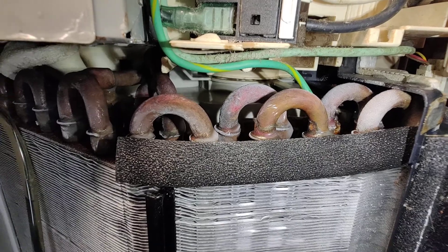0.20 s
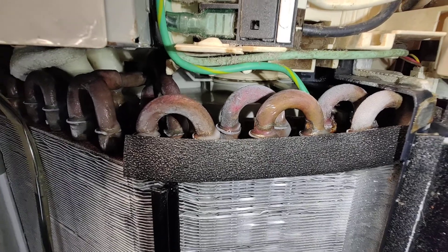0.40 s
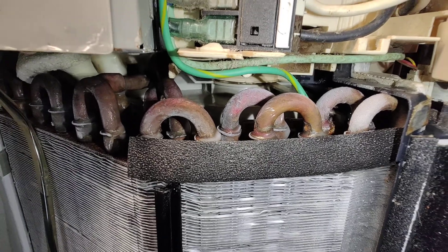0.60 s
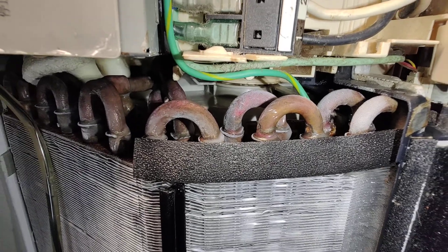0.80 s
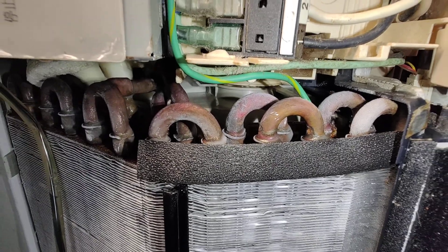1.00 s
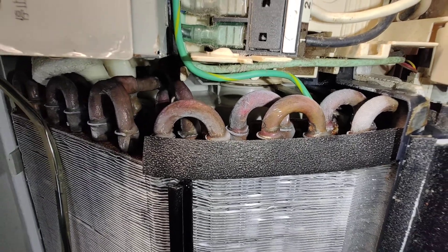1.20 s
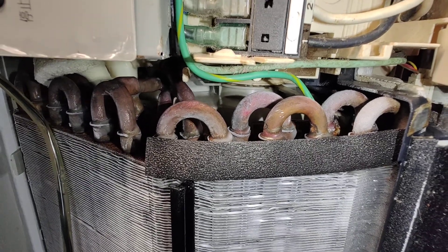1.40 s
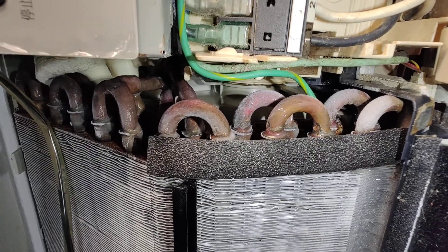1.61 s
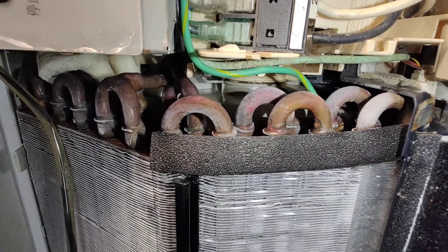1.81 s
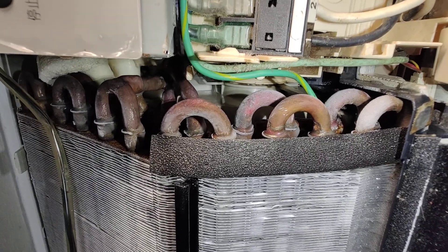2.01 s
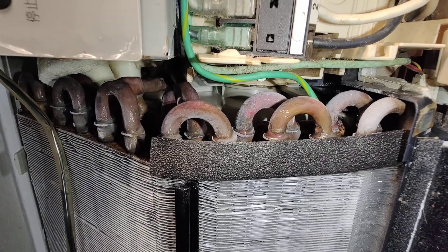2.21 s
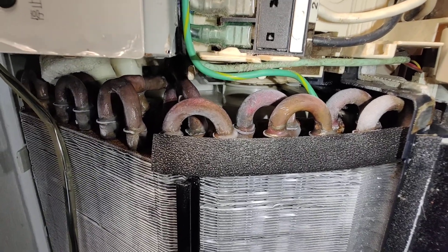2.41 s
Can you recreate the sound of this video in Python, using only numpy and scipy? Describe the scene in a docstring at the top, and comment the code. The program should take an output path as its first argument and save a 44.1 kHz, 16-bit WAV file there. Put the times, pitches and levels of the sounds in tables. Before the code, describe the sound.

Irregular sharp ticks from an icing air conditioner coil over a faint low hum, up close

```python
"""An open indoor air conditioner, heard from close by in a quiet room.
From start to end there is a low motor hum, made of sine tones, and soft air noise, made of filtered noise.
The coil ticks irregularly as it ices up: each slip of a few milliseconds rings fins and tubes.
Small dry snaps, short bursts of pitched noise, fall between the ticks.
Past midway something rubs lightly: a fine, bright crackle of tiny noise grains. Then more ticks and snaps."""
import sys
import numpy as np
from scipy import signal
from scipy.fft import rfft, irfft
from scipy.io import wavfile

SR = 44100
rng = np.random.default_rng(int(sys.argv[2]) if len(sys.argv) > 2 else 0)


def dump(signal):
    """Clip the signal to [-1, 1] and save it as 16-bit WAV at the path in sys.argv[1]."""
    limited = np.clip(np.atleast_2d(signal).T, -1, 1)
    pcm = np.round(limited * 32767).astype(np.int16)
    wavfile.write(sys.argv[1], SR, pcm)


N = 110250  # length in samples: 2.5 s


def amp(db):
    """Turns decibels into gain."""
    return 10 ** (np.asarray(db) / 20)


def unit(x):
    """Scales a sound to rms 1."""
    return x / np.sqrt(np.mean(x ** 2) + 1e-30)


def read_table(points, hz):
    """Reads a table between its points, on a log-frequency axis."""
    table_hz, value = np.transpose(points)
    return np.interp(np.log(hz + 1), np.log(table_hz + 1), value)


def colour(x, points):
    """Filters a sound by a table of (pitch_hz, level_db)."""
    n = x.shape[-1]
    padded = 2 * n  # keeps the end from wrapping onto the start
    gain = amp(read_table(points, np.fft.rfftfreq(padded, 1 / SR)))
    return irfft(rfft(x, padded) * gain)[..., :n]


def pan(db):
    """Gains of left and right; a positive number leans left."""
    return amp(np.array([[db], [-db]]) / 2)


def add(mix, start_s, sound):
    """Mixes a sound in at a time, cutting it at the end of the mix."""
    part = mix[:, round(start_s * SR):][:, :sound.shape[1]]
    part += sound[:, :part.shape[1]]


def drift(rate_hz, size):
    """Smooth random motion of rms 1, made by low-passing noise."""
    hz = np.fft.rfftfreq(size, 1 / SR)
    low_pass = np.exp(-(hz / rate_hz) ** 2) * (hz > 0)
    return unit(irfft(rfft(rng.standard_normal(size)) * low_pass, size))


def noise_pair(likeness, size):
    """White noise in two channels that are alike by a set amount at each pitch."""
    left, other = rfft(rng.standard_normal((2, size)))
    shared = np.clip(read_table(likeness, np.fft.rfftfreq(size, 1 / SR)), -1, 1)
    right = shared * left + np.sqrt(1 - shared ** 2) * other
    return irfft(np.array([left, right]), size)


# loudness of the moving air: pitch_hz, level_db (per Hz)
AIR_SPECTRUM = [(20, -95), (35, -95), (48, -82), (72, -77.5), (90, -83.5), (125, -73), (160, -75),
                (225, -76.5), (262, -84.5), (290, -82.5), (330, -76.5), (385, -87), (480, -84.5),
                (590, -92), (740, -85), (1050, -94.5), (1600, -98.5), (2200, -92), (3600, -103),
                (6500, -105), (7700, -104), (8300, -109), (10000, -116), (12000, -111), (15500, -113)]
# how alike the two channels of the air are: pitch_hz, likeness (0 to 1)
AIR_LIKENESS = [(60, 0.7), (170, 1), (320, 0.55), (700, 0.02), (1300, 0), (2200, 0.1), (4000, 0.09),
                (15000, 0.05)]
AIR_SWELL_DB, AIR_SWELL_HZ = 0.95, 2.9  # rms size and speed of the slow level changes
AIR_PAN_DB = -0.5


def air():
    """Air moving in the casing makes broad noise, a soft rumble and hiss that swells gently."""
    per_hz = np.sqrt(SR / 2)  # makes the table count per Hz
    flow = colour(noise_pair(AIR_LIKENESS, size=N), AIR_SPECTRUM) * per_hz
    swell = amp(AIR_SWELL_DB * drift(AIR_SWELL_HZ, size=N))
    return flow * pan(AIR_PAN_DB) * swell


# steady motor tones: pitch_hz, level_db (rms), pan_db (left minus right)
HUM_TONES = [(48.4, -72.5, -19), (62.7, -57.5, 3.5), (117.95, -55.5, 0.5), (119.9, -68, 8), (131.3, -62, 4),
             (180.5, -63, 5), (208.2, -63.5, 10.5), (238.7, -61.5, 2.5), (298.7, -63, 1.5)]
WAVER_HZ, WAVER_DEPTH, WAVER_RAD = 4.3, 0.3, 0.13  # speed; rms level (fraction) and phase motion
# level curve of the low drone: time_s, level_db (before DRONE_TRIM_DB)
DRONE_LEVEL = [(0.0, -53.5), (0.05, -48), (0.42, -56), (0.48, -63), (0.54, -49.5), (1.23, -54),
               (1.29, -47.5), (1.53, -52), (1.67, -45), (1.77, -50.5), (2.47, -49), (2.5, -65)]
DRONE_HZ, DRONE_TRIM_DB, DRONE_PAN_DB = 66.4, -1, -0.5


def hum():
    """The motor hums in steady tones that waver a little, with one low drone that swells and dips."""
    t = np.arange(N) / SR
    drone = unit(np.sin(2 * np.pi * (DRONE_HZ * t + rng.random())))
    drone_db = DRONE_TRIM_DB + np.interp(t, *np.transpose(DRONE_LEVEL))
    out = pan(DRONE_PAN_DB) * drone * amp(drone_db)
    for pitch_hz, level_db, pan_db in HUM_TONES:
        phase = 2 * np.pi * (pitch_hz * t + rng.random()) + WAVER_RAD * drift(WAVER_HZ, size=N)
        loudness = 1 + WAVER_DEPTH * drift(WAVER_HZ, size=N)
        out += amp(level_db) * pan(pan_db) * unit(np.sin(phase) * loudness)
    return out


# how long the room rings: pitch_hz, fall_s (time to drop 60 dB)
ROOM_FALL = [(500, 0.1), (2200, 0.2), (5000, 0.18), (9000, 0.15), (15000, 0.14)]
ROOM_DB, ROOM_RISE_S = -8, 0.0047  # level of the tail in the mix; time it takes to build up


def room(x):
    """Many mixed echoes act like fading noise; this tail lasts longest in the middle pitches."""
    hz, t, grid = signal.stft(rng.standard_normal((2, SR // 2)), SR, nperseg=256)
    fade = np.exp(-np.log(1000) * t / read_table(ROOM_FALL, hz)[:, None])
    tail = signal.istft(grid * fade, SR)[1]
    tail = tail * np.minimum(np.arange(tail.shape[1]) / SR / ROOM_RISE_S, 1) ** 2
    return signal.fftconvolve(x, tail / np.linalg.norm(tail[0]), axes=1)[:, :N]


GRAINS_PER_S, GRAIN_SPREAD_DB, GRAIN_FADE_S = 3000, 2, 0.00064


def fizz(level, tone, trim_db):
    """A rubbing surface catches at random: dense tiny noise grains in one range of pitch."""
    t = np.arange(N) / SR
    time_s, level_db = np.transpose(level)
    strength = amp(GRAIN_SPREAD_DB * np.minimum(rng.exponential(1, N), 5))
    catches = (rng.random(N) < GRAINS_PER_S / SR) * strength
    # each catch fades on its own; overlapping grains add in power
    power = signal.lfilter([1], [1, -np.exp(-2 / (GRAIN_FADE_S * SR))], catches ** 2)
    crackle = unit(colour(np.sqrt(power) * rng.standard_normal((2, N)), tone))
    gate = np.clip(np.minimum(t - time_s[0], time_s[-1] - t) / 0.0032, 0, 1)  # 3.2 ms fades
    return crackle * amp(trim_db + np.interp(t, time_s, level_db)) * gate


# level curves of the three ranges of the rub: time_s, level_db (before the trims below)
LOW_FIZZ_LEVEL = [(1.484, -54), (1.492, -52.5), (1.506, -58.5), (1.514, -45.5), (1.528, -66),
                  (1.546, -57.5), (1.6, -67), (1.68, -79)]
MID_FIZZ_LEVEL = [(1.484, -51), (1.491, -49.5), (1.506, -46), (1.53, -37), (1.548, -38), (1.594, -46.5),
                  (1.605, -42), (1.626, -43), (1.65, -54), (1.69, -75)]
TOP_FIZZ_LEVEL = [(1.484, -62), (1.52, -55), (1.532, -48), (1.546, -33), (1.575, -45), (1.596, -38.5),
                  (1.612, -61), (1.63, -49), (1.638, -37), (1.655, -46), (1.69, -73)]
# tone of the three ranges, near 3 kHz, at 6-11 kHz and above 12 kHz: pitch_hz, level_db (relative)
LOW_FIZZ_TONE = [(1800, -31), (2500, -7), (2900, 7), (3400, -7), (3900, -8.5), (4900, -16), (5500, -35),
                 (8000, -38)]
MID_FIZZ_TONE = [(3000, -45), (5300, -27), (6000, 1.5), (8200, 2), (10000, 4.5), (10700, 0), (12500, -9),
                 (15000, -30)]
TOP_FIZZ_TONE = [(8000, -26.5), (10800, -23), (12100, 2), (12900, -3), (14000, 5), (15400, 0), (16200, -21)]
LOW_TRIM_DB, MID_TRIM_DB, TOP_TRIM_DB, RUB_PAN_DB = 4, 0.5, 1.5, -2.5


def rub():
    """A light rub: three ranges of fizz, each with its own swells."""
    low = fizz(LOW_FIZZ_LEVEL, LOW_FIZZ_TONE, LOW_TRIM_DB)
    middle = fizz(MID_FIZZ_LEVEL, MID_FIZZ_TONE, MID_TRIM_DB)
    top = fizz(TOP_FIZZ_LEVEL, TOP_FIZZ_TONE, TOP_TRIM_DB)
    return pan(RUB_PAN_DB) * (low + middle + top)


# tiny dry snaps: start_s, level_db (before the fade), pitch_hz (centre), pan_db (left minus right),
# fade_s (time to fall to 37 %)
DRY_SNAPS = [(0.78, -44, 2400, -8.5, 0.0027), (1.5008, -36, 9600, -12, 0.00093),
             (1.5147, -37, 2800, -1, 0.0022), (2.2392, -42, 2600, -7, 0.0025),
             (2.4056, -47, 13400, -4, 0.0013), (2.417, -44, 13100, -4, 0.0014),
             (2.4278, -50, 7100, -4, 0.0031)]
SNAP_OCTAVES = 0.15  # distance from the centre at which the gain is halved


def snaps():
    """Tiny dry cracks without fin or tube ring: fading noise around a pitch of their own."""
    out, t = np.zeros((2, N)), np.arange(1024) / SR
    hz = np.fft.rfftfreq(len(t), 1 / SR)
    for start_s, level_db, pitch_hz, pan_db, fade_s in DRY_SNAPS:
        octaves_away = np.log2((hz + 1) / pitch_hz)
        band = 1 / (1 + (octaves_away / SNAP_OCTAVES) ** 2)
        crack = unit(irfft(rfft(rng.standard_normal((2, len(t)))) * band))
        add(out, start_s, amp(level_db) * pan(pan_db) * crack * np.exp(-t / fade_s))
    return out


LEAD_S, TICK_SAMPLES = 0.012, 8192  # room before the slip for its build-up; length of one tick
# dense ring of the fin pack: pitch_hz, level_db (relative)
FIN_TONE = [(100, -39), (450, -37), (750, -7), (1500, -9.5), (2100, -5), (2900, -1), (3700, -6), (4700, 2),
            (5300, -6.5), (6500, 1.5), (7900, 0.5), (9000, -7), (10500, -6.5), (12000, -1), (15000, 0.5),
            (15700, -26)]
# how alike the two channels of the fins are: pitch_hz, likeness (-1 to 1)
FIN_LIKENESS = [(700, .4), (1200, 0.082), (2200, 0.41), (4000, -0.13), (9000, 0.2), (16000, 0.13)]
RISE_S, RING_S = 0.0013, 0.0032  # build-up before the slip and fade after it, each to 37 %
SLIP_ROUGH_DB, SLIP_GRAIN_HZ = -1.5, 1500  # size and speed of the unevenness


def fins(slip_s):
    """A short, uneven slip gathers and shakes the dense modes of the fins, which die quickly."""
    t = np.arange(TICK_SAMPLES) / SR - LEAD_S
    shape = np.exp(np.minimum(t, 0) / RISE_S - np.maximum(t - slip_s, 0) / RING_S)
    roughness = amp(SLIP_ROUGH_DB * drift(SLIP_GRAIN_HZ, size=len(t)))
    shake = noise_pair(FIN_LIKENESS, size=len(t)) * shape * roughness
    return colour(unit(shake) * np.sqrt(np.mean(shape ** 2)), FIN_TONE)  # power set by the shape


# ringing modes of the tubes: pitch_hz, level_db (relative), fall_s (time to drop 60 dB)
TUBE_MODES = [(718, -31.5, 0.13), (2151, -5.5, 0.031), (2752, -22, 0.046), (3510, -19.5, 0.053),
              (4610, -14, .035), (5620, -13, 0.022), (6270, -22, 0.034), (6880, -10, 0.026),
              (7880, -13, 0.021), (8400, -20, .035), (11360, -4, 0.021), (13100, -12, 0.025),
              (14030, -6, 0.02), (14800, -22, .035)]
TUBE_RISE_S = 0.00083
TUBE_PHASE_HZ = 5340  # the phase gap between the channels widens up to this pitch


def tubes():
    """The same slip rings the tubes, each mode a fading sine with its own pitch."""
    t = np.maximum(np.arange(TICK_SAMPLES) / SR - LEAD_S, 0)
    out = np.zeros((2, len(t)))
    for pitch_hz, level_db, fall_s in TUBE_MODES:
        spread = min((pitch_hz / TUBE_PHASE_HZ) ** 2, 1)
        turns = rng.random() + rng.uniform(-0.083, 0.7, (2, 1)) * spread  # start phase per channel
        ring = np.sin(2 * np.pi * (pitch_hz * t + turns))
        out += amp(level_db) * np.exp(-np.log(1000) * t / fall_s) * ring
    return out * (1 - np.exp(-t / TUBE_RISE_S))


LOW_HZ, MID_HZ, HIGH_HZ = 2140, 5840, 11500  # where the colours of a tick apply


def tick(level_db, slip_s, low_db, high_db, pan_db, tubes_db):
    """Fins and tubes sound together, coloured by where the coil slips."""
    sound = fins(slip_s) + amp(tubes_db) * tubes()
    tone = [(LOW_HZ, low_db), (MID_HZ, 0), (HIGH_HZ, high_db)]
    return amp(level_db) * pan(pan_db) * colour(sound, tone)


# ticks of the coil: start_s, level_db (gain), slip_s, low_db and high_db (colour),
# pan_db (left minus right), tubes_db (gain of the tubes)
COIL_TICKS = [(0.2026, -11, 0.0027, -4, -3, 1.5, 0), (0.3238, -31.5, .004, 5.5, -3.5, 2.5, -1),
              (0.908, -27.5, 0.004, -3.5, -12.5, 0.5, -0.5), (0.913, -50, 0.0033, 11, -19, 5, 7),
              (1.176, -48, 0.0055, 0.5, -7, 5, -3), (1.201, -50.5, 0.0079, 5.5, -4.5, 2, -1.5),
              (1.3238, -45.5, 0.0057, 4.5, -2.5, 3.5, 2), (1.3860, -55, 0.0022, 4, -6, 5, 1),
              (1.4683, -40, 0.0052, 1.5, -3.5, 2, -4), (1.878, -55, 0.0029, 13.5, -9, -2, -10),
              (2.2245, -35.5, 0.0032, -2, -1.5, 4, -6.5), (2.2288, -42, 0.0038, 1, -11, -8, 0),
              (2.293, -30, 0.0034, -5.5, -2.5, 1.5, -2)]


def coil():
    """The icing coil slips now and then, and each slip gives one tick."""
    out = np.zeros((2, N))
    for start_s, *settings in COIL_TICKS:
        add(out, start_s - LEAD_S, tick(*settings))
    return out


def scene():
    """Ticks and snaps with a soft room tail, over rub, hum and air."""
    small = snaps()
    # several noise draws make the tail smoother
    tails = [room(coil() + small) for _ in range(3)]
    tail = sum(tails) / np.sqrt(len(tails))
    return air() + hum() + amp(ROOM_DB) * tail + rub() + small + coil()


EDGE_HZ = 15900  # upper limit of the sound


def record(dry):
    """A steep low-pass filter removes the highest treble."""
    low_pass = signal.firwin(255, EDGE_HZ, window=("kaiser", 8), fs=SR)
    return signal.oaconvolve(dry, low_pass[None], "same")


dry = scene()
out = record(dry)
dump(out)
```